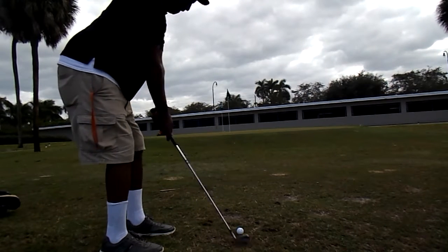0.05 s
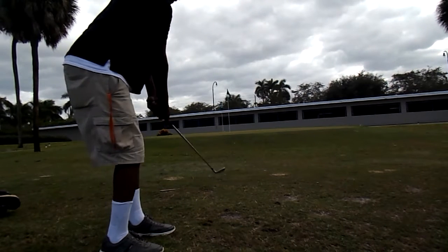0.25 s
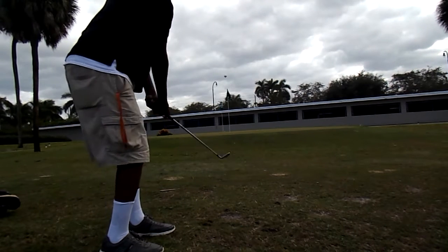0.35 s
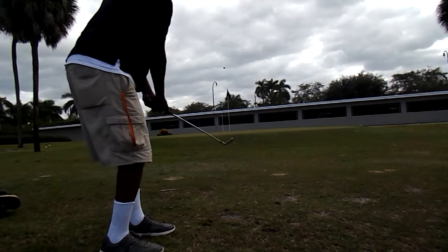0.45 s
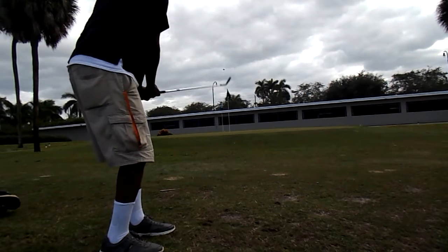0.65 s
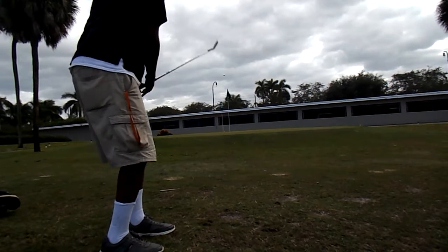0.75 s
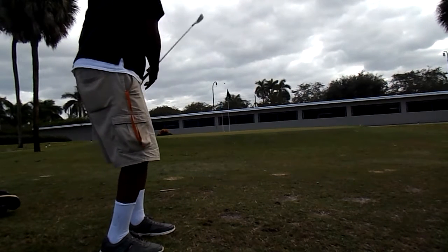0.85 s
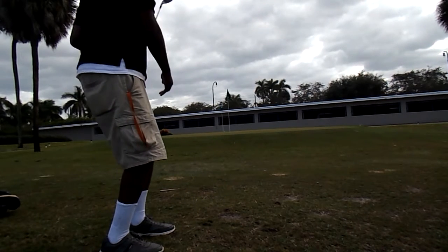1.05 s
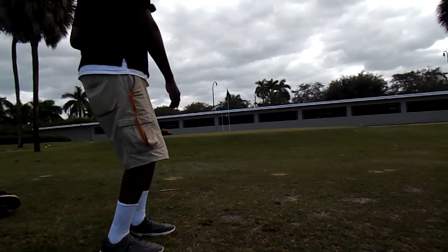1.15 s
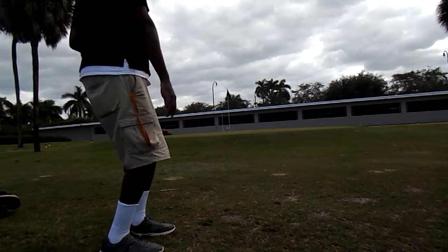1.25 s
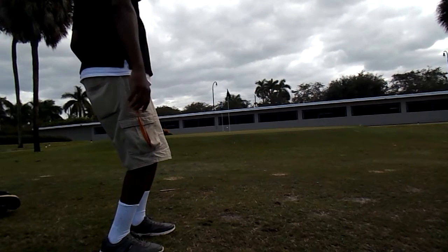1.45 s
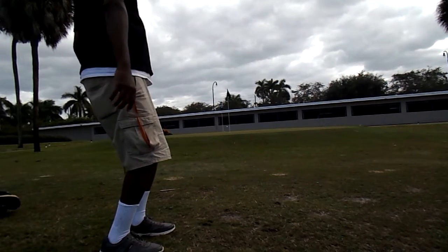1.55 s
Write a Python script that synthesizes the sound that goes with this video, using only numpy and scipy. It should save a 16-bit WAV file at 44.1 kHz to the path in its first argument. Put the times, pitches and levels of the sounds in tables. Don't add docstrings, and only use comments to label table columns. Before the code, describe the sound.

A golf club strikes a ball with one short, hard click, its sole lightly brushing the grass, followed by a faint scattered outdoor echo; low distant traffic, a soft engine drone and microphone hiss continue underneath.

```python
import sys
import numpy as np
from scipy import signal
from scipy.fft import rfft, irfft
from scipy.io import wavfile
from scipy.ndimage import uniform_filter1d

SR = 44100
rng = np.random.default_rng(int(sys.argv[2]) if len(sys.argv) > 2 else 0)


def pcm_store(signal):
    levels = np.round(np.clip(np.atleast_2d(signal), -1, 1) * 32767)
    wavfile.write(sys.argv[1], SR, levels.astype(np.int16).T)


def how_loud(loudness_db):
    steps = np.asarray(loudness_db, float) / 20
    return 10 ** steps


N = 70560

# start_s, level_db
CLUB_BLOWS = [
    (.2149, -35.5),
    (.21524, -20),
    (.2158, -30.5),
    (0.2071, -52),
    (0.212, -52),
    (0.213, -46.5),
]


def evened(x):
    return x / np.sqrt(np.mean(x ** 2) + 1e-20)


def read_curve(points, hz):
    f, value = np.transpose(points)
    return np.interp(np.log(hz + 1), np.log(f + 1), value)


def coloured(x, gain_db):
    hz = np.fft.rfftfreq(len(x), 1 / SR)
    return irfft(rfft(x) * how_loud(gain_db(hz)), len(x))


def club_strike():
    # pitch_hz, level_db, t60_s, face_side (moving out 1 or in -1)
    modes = [(349, -17.5, 0.033, 1), (956, -11.5, 0.028, 1), (1255, 3, 0.014, 1), (1716, -6, 0.011, -1),
             (2026, -6, 0.013, 1), (2327, -12.5, 0.014, 1), (2884, -14, 0.016, 1), (4053, 2, .014, 1),
             (8960, -17.5, 0.0077, -1), (6160, -7.5, 0.01, -1), (7050, -11.5, 0.0081, -1),
             (7770, -11, 0.0068, -1), (10500, -18.5, 0.0045, 1), (13300, -13, .003, -1)]
    ground_delay_s, ground_db = 0.001018, -22
    crack_db, crack_t60_s = -27, 0.013
    ring_samples = 20000
    t, out = np.arange(N) / SR, np.zeros(N)
    ground_blows = [(start + ground_delay_s, db + ground_db) for start, db in CLUB_BLOWS]
    for start, level_db in list(CLUB_BLOWS) + ground_blows:
        age = np.maximum(t - start, 0)[:ring_samples]
        ring = 0
        for hz, db, t60, side in modes:
            ring = ring + np.sign(side) * how_loud(db - 60 * age / t60) * np.sin(2 * np.pi * hz * age)
        out[:ring_samples] += how_loud(level_db) * ring
    age = t - CLUB_BLOWS[0][0]
    crack_level = how_loud(crack_db - 60 * np.maximum(age, 0) / crack_t60_s)
    out = out + rng.standard_normal(N) * (age > 0) * crack_level
    return signal.sosfilt(signal.butter(4, 310, "high", fs=SR, output="sos"), out)


def scattered_echoes(hit):
    # arrival_s, time to fall 20 dB_s (negative swells instead), level_db
    clusters = [
        (0.2266, -0.2, -30),
        (.232, -0.1, -36),
        (0.248, .02, -25.5),
        (.258, -0.25, -37),
        (.275, -0.3, -35.5),
        (.282, 0.5, -31.5),
        (.385, -0.5, -38),
    ]
    taps_per_s, rise_s = 4000, 0.0016
    cut_hz, ring_hz, ring_db = 1500, 4200, 2
    t = np.arange(N) / SR + CLUB_BLOWS[0][0]
    taps = rng.standard_normal(N) * (rng.random(N) < taps_per_s / SR)
    response = 0
    for arrival, fall, db in clusters:
        age = np.maximum(t - arrival, 0)
        cluster = taps * np.minimum(age / rise_s, 1) * how_loud(-20 * age / fall)
        response = response + how_loud(db) * cluster / (np.linalg.norm(cluster) + 1e-9)

    def scatter_db(f):
        low_cut = -10 * np.log10(1 + (cut_hz / (f + 1)) ** 4)
        return low_cut + ring_db / (1 + ((f - ring_hz) / 200) ** 2)

    return signal.fftconvolve(coloured(hit, scatter_db), response)[:N]


def stroke_swell(t, start, length):
    u = np.clip((t - start) / length, 0, 1)
    return np.sin(np.pi * np.sqrt(u)) ** 2


def grass_brush():
    # start_s, length_s, level_db
    strokes = [
        (.203, 0.011, -48),
        (0.2077, 0.01, -54),
        (0.22, 0.03, -54.5),
        (.245, 0.028, -53.5),
        (0.269, 0.033, -60),
    ]
    # pitch_hz, level_db
    rustle_colour = [(500, -11), (1400, -6), (3000, -7), (4100, 1.5), (5300, -9), (8800, -0.5), (14900, -4),
                     (16500, -20)]
    t = np.arange(N) / SR
    snap_db = 1.9 * uniform_filter1d(rng.exponential(1, N), size=6)
    grains = rng.standard_normal(N) * how_loud(snap_db)
    rustle = evened(coloured(grains, lambda f: read_curve(rustle_colour, f)))
    return rustle * sum(how_loud(db) * stroke_swell(t, start, length) for start, length, db in strokes)


def engine_drone():
    # pitch_hz, width_hz, level_db (re the drone level)
    bands = [(70, 15, -11), (123.4, 11, -4), (139.8, 9.7, -2.5), (210.9, 8, -9), (233.4, 9.5, -9.5),
             (295, 10.7, -11.5)]
    # time_s, level_db
    drift = [
        (0, -61.5),
        (.15, -62.5),
        (.28, -54),
        (.45, -59.5),
        (.75, -58.5),
        (1.1, -63),
        (1.6, -63.5),
    ]
    drift_db = np.interp(np.arange(N) / SR, *np.transpose(drift))
    out = np.zeros(N)
    for centre, width, db in bands:
        band = coloured(rng.standard_normal(N),
                        lambda f: -20 * np.log10(1 + ((f - centre) / width * 2) ** 2))
        out = out + how_loud(db + drift_db) * evened(band)
    return out


def far_traffic():
    # pitch_hz, density_db (per Hz)
    colour = [(25, -20.5), (70, -10.5), (135, -4), (300, -8.5), (600, -15), (950, -15.5), (2000, -20),
              (4000, -32)]
    level_db, rise_db_per_s = -54, 0.3
    patchy_db, swell_db = 1.0, 0.15
    fall_db = -15.5
    frames = N // 256 + 5
    real, imag, patches = rng.standard_normal((frames, 513, 3)).T
    patches = uniform_filter1d(patches, size=10, axis=0)
    patches = evened(uniform_filter1d(patches, size=14, axis=1))
    slow = evened(uniform_filter1d(rng.standard_normal(frames), size=40))
    field = how_loud(patchy_db * patches + swell_db * slow)
    wash = signal.istft((real + 1j * imag) * field, nperseg=1024, noverlap=768)[1][:N]
    top = colour[-1][0]
    wash = coloured(wash, lambda f: read_curve(colour, f) + fall_db * np.log2(np.maximum(f, top) / top))
    rise_db = rise_db_per_s * (np.arange(N) - N / 2) / SR
    return how_loud(level_db + rise_db) * evened(wash)


def microphone_hiss():
    # pitch_hz, density_db (per Hz)
    colour = [(1000, 0), (5000, -0.5), (9000, -1.5), (15500, -4.5)]
    return how_loud(-66.5) * evened(coloured(rng.standard_normal(N), lambda f: read_curve(colour, f)))


def electronic_whine():
    comb_hz, step_hz, tones_each_side = 10518.5, 79.7, 6
    comb_db, fall_db = -95, -0.142
    t = np.arange(N) / SR
    tones = [(11718.8, -89.5)]
    for k in range(-tones_each_side, tones_each_side + 1):
        tones.append((comb_hz + k * step_hz, comb_db + fall_db * k ** 2))
    return sum(how_loud(db) * np.sqrt(2) * np.sin(2 * np.pi * (hz * t + rng.random())) for hz, db in tones)


def scene():
    hit = club_strike()
    background = far_traffic() + microphone_hiss() + engine_drone() + electronic_whine()
    quiet = scattered_echoes(hit) + grass_brush() + background
    quiet = coloured(quiet, lambda f: -70 * np.clip((f - 15730) / 100, 0, 1))
    click = coloured(hit, lambda f: -12 * np.clip((f - 15600) / 600, 0, 1) - 60.0 * (f > 16750))
    return (quiet + click)[None]


def band_limit(x):
    return signal.sosfilt(signal.butter(12, 16830, fs=SR, output="sos"), x)


def record(dry):
    return band_limit(dry)


dry = scene()
out = record(dry)
pcm_store(out)
```